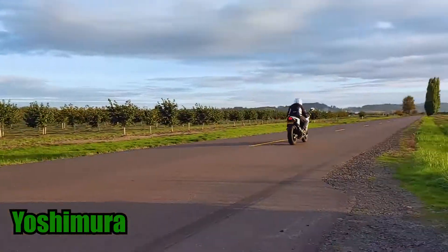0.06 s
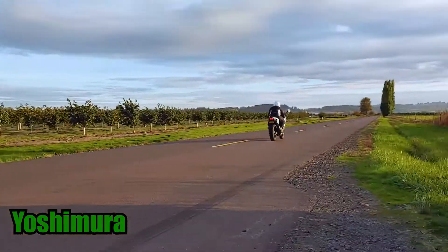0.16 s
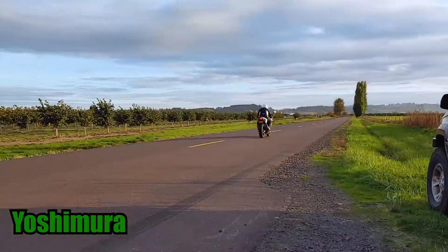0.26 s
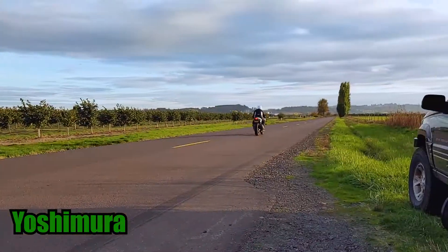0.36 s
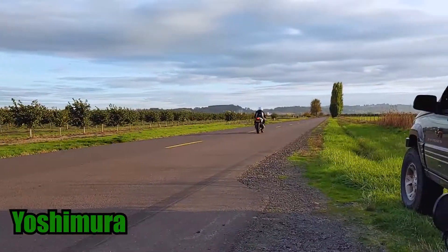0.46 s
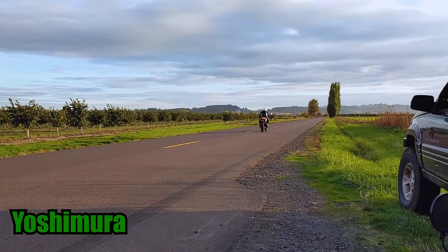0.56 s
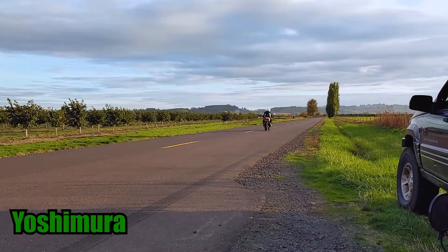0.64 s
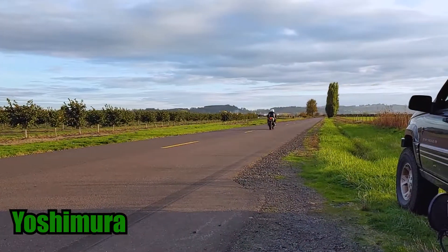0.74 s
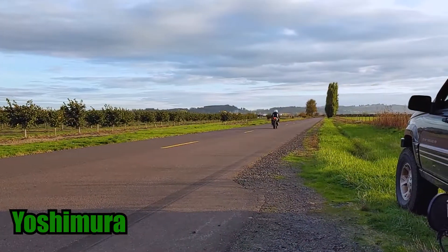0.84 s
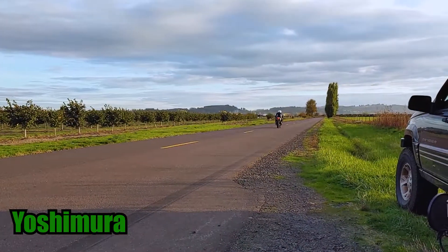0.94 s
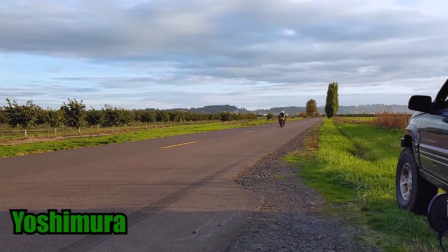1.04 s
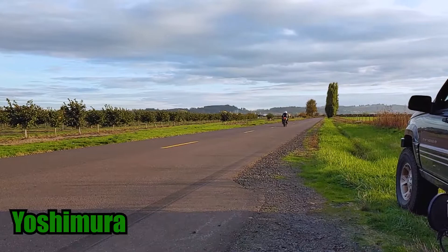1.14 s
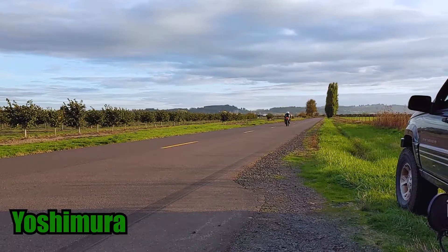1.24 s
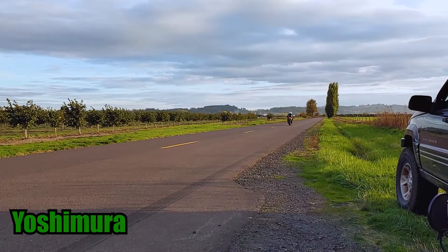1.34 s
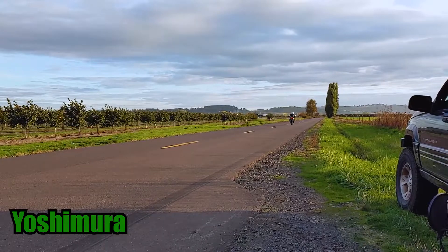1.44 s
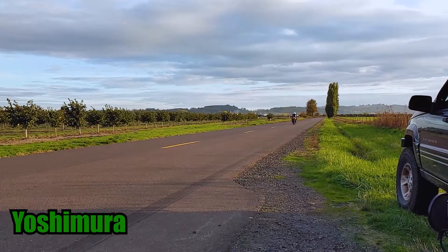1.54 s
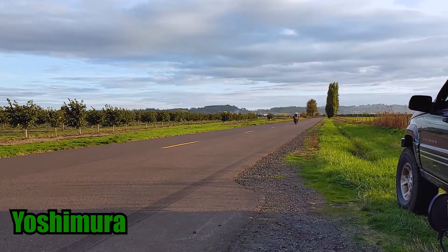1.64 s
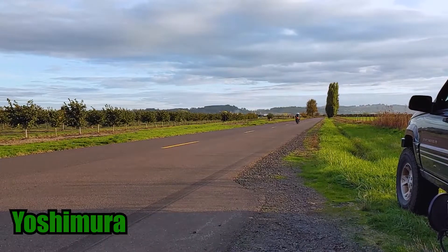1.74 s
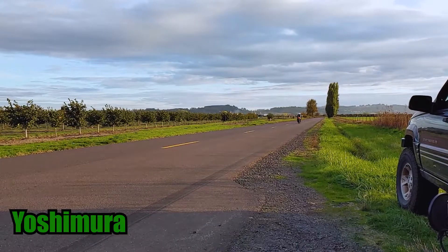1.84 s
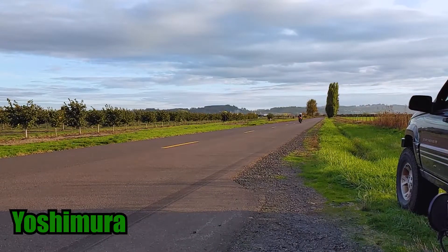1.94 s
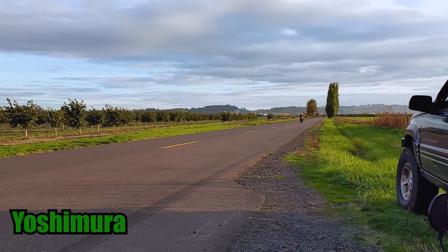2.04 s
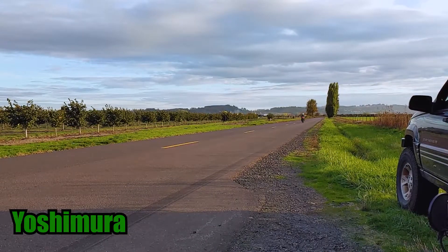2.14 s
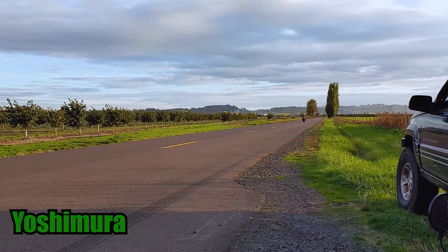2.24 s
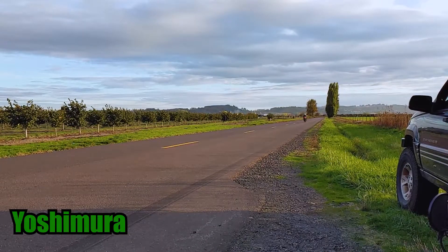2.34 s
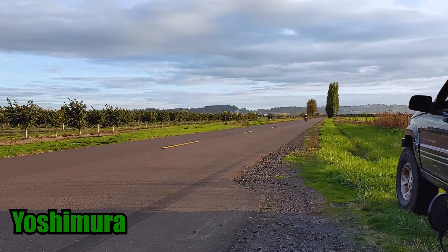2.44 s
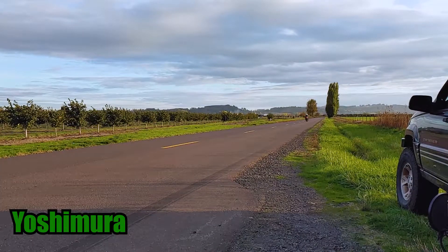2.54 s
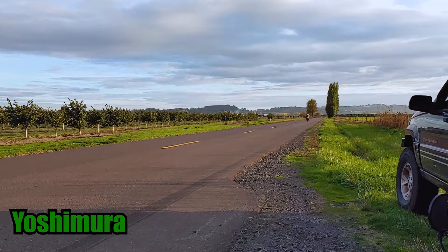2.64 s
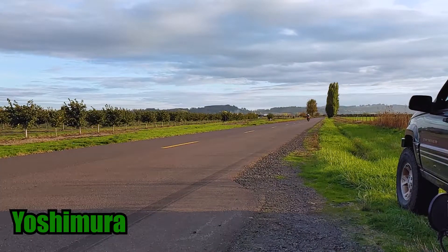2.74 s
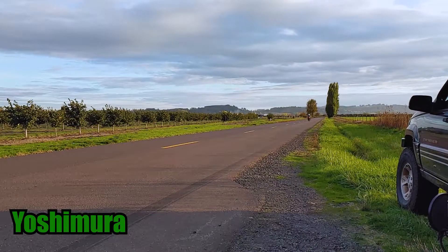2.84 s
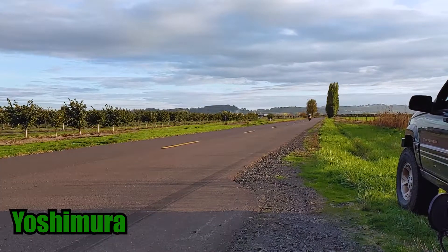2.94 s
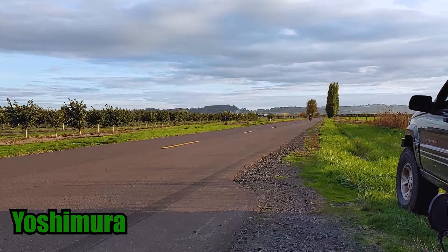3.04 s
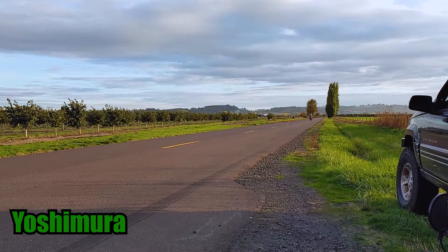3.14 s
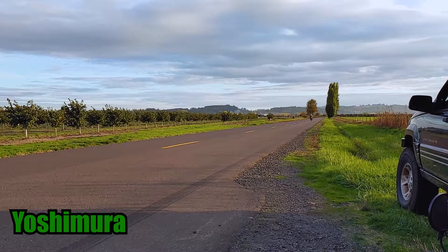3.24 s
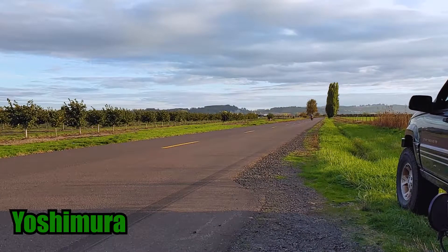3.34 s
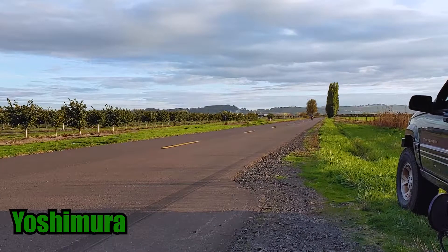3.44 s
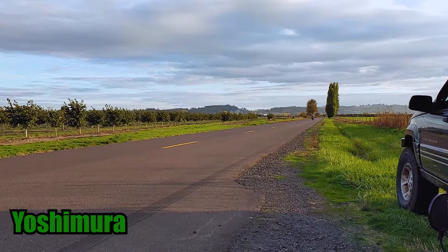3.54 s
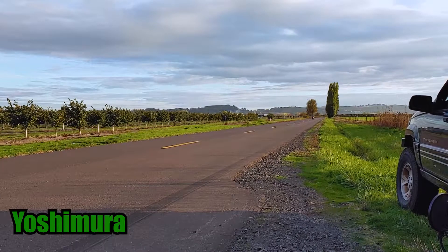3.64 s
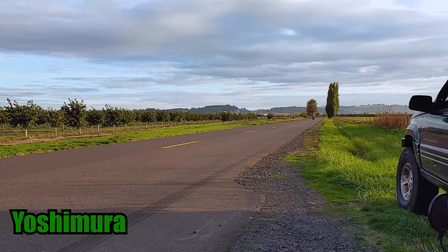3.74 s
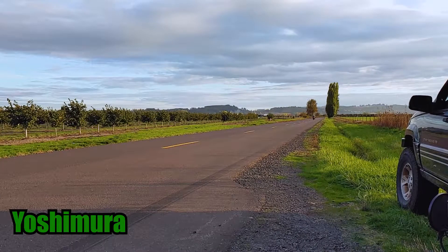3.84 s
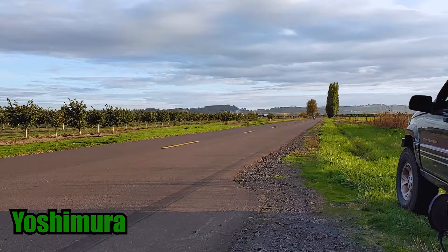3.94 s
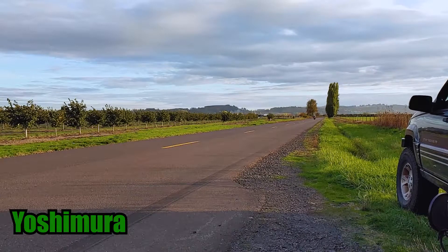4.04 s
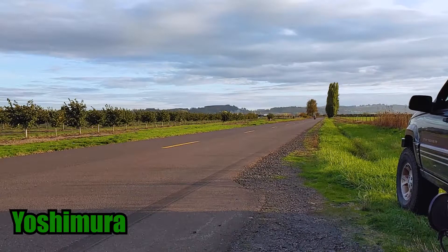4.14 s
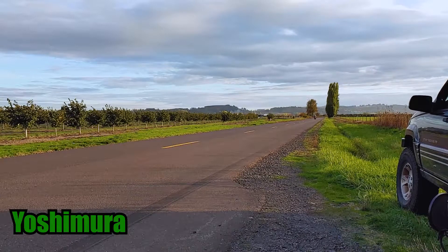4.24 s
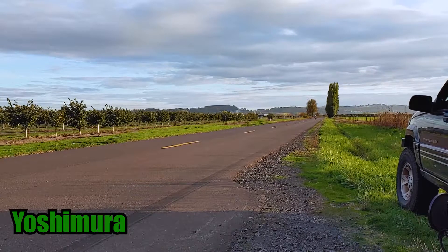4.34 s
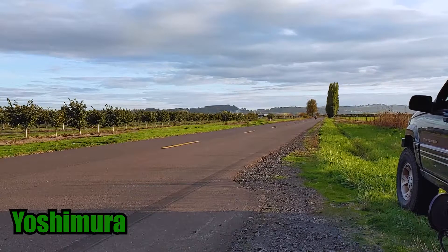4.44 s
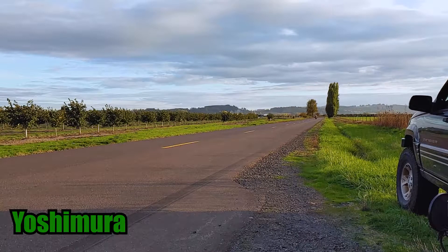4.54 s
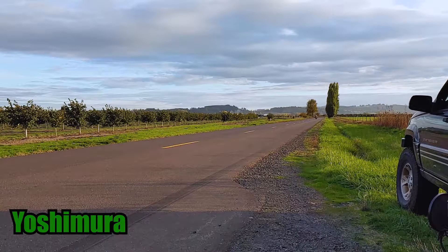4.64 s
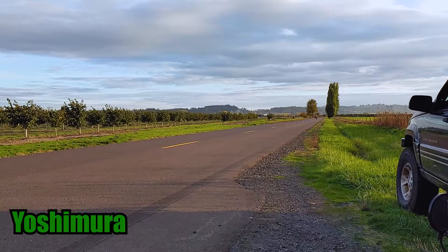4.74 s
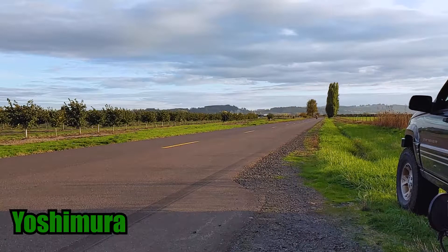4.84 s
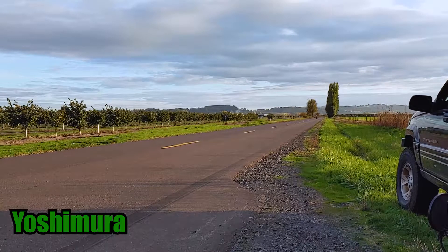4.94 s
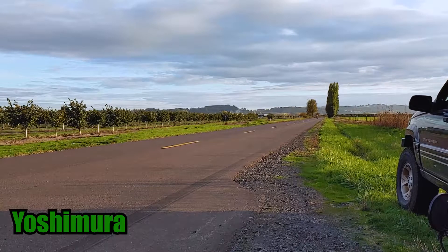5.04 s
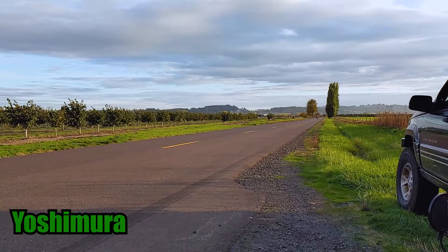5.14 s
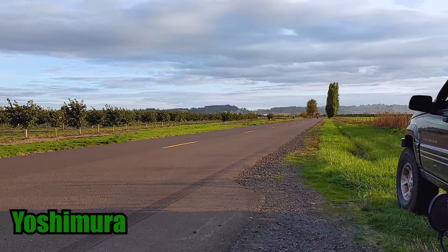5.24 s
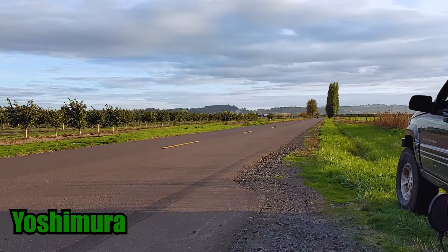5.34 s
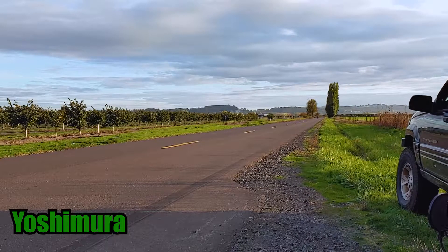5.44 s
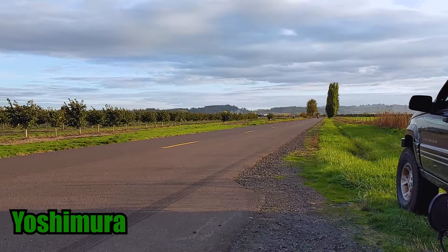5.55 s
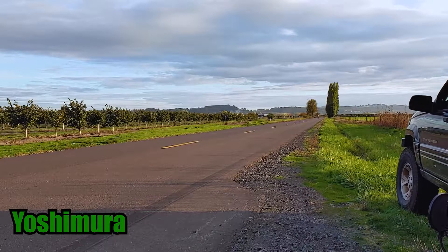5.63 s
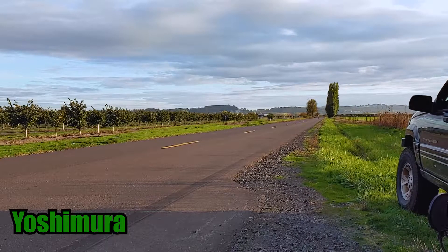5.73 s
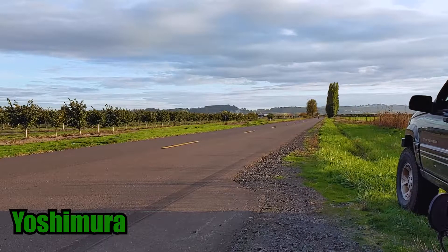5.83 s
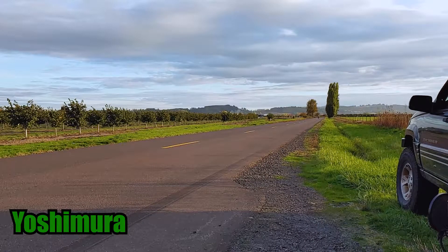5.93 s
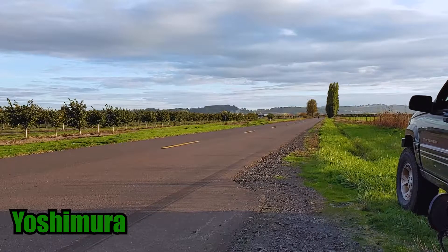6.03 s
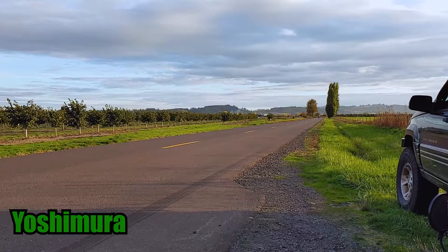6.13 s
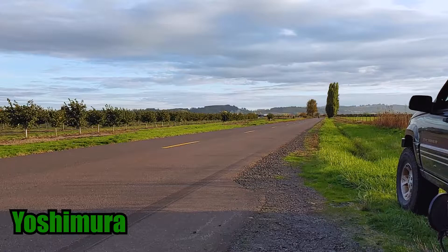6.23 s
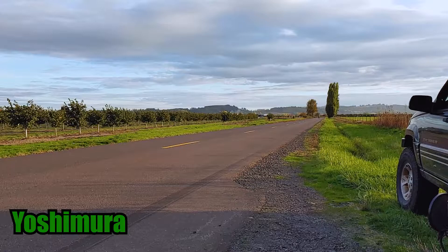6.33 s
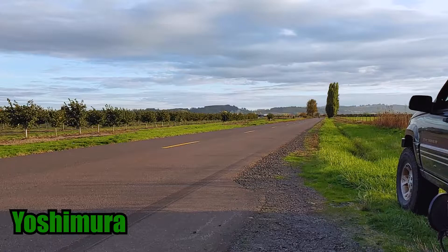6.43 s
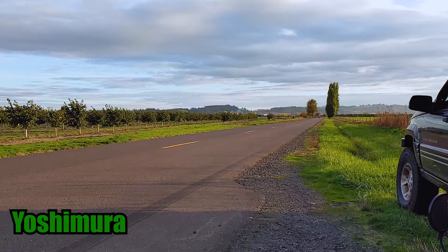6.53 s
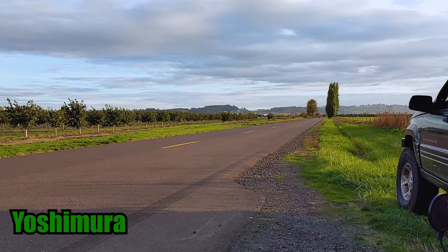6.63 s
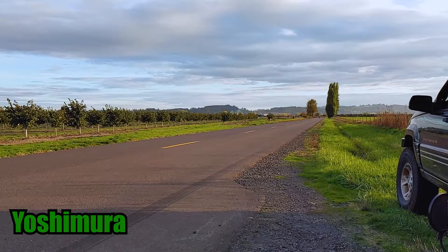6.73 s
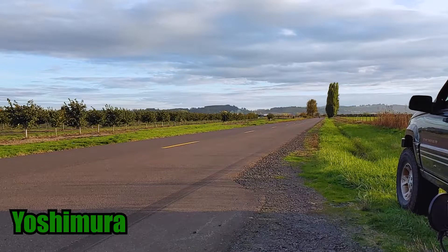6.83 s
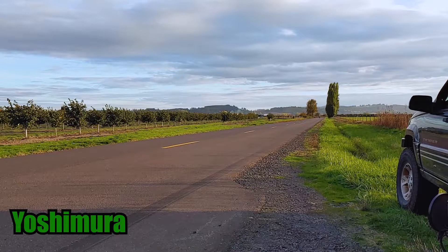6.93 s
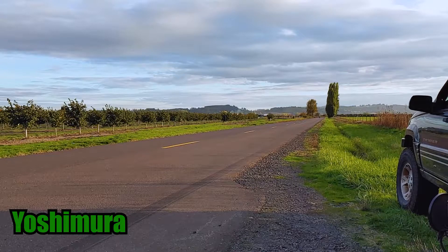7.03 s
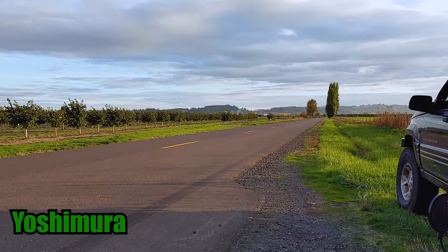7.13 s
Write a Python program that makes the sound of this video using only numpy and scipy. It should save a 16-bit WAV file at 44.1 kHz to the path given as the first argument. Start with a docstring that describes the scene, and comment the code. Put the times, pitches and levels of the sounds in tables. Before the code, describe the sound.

A loud motorcycle has just passed a fixed roadside microphone in open farmland. From 0 s its exhaust is close and heavy: a low, rapid throbbing with a hard bark, rough gas rasp and a slight metallic ring. Over the first three seconds the pitch climbs steadily while the machine recedes, losing bite and treble, the rasp sharpening just before the shift. At about 3.2 s the throttle snaps shut for an instant; a brief burble, spit and dull thud follow, and by 3.5 s the note has dropped noticeably and pulls again in the higher gear. It rises slowly until about 5.4 s, increasingly distant and with shifting colour. Then the rider rolls off: the roar collapses into a quiet low coasting burble, sinking in pitch, with a faint gear whine swelling around 6.6 s. Very faint field rustle and soft low wind bumps, mainly from 3.9 s, lie behind. It ends near 7 s.

```python
"""A loud motorcycle pulls away down a country road, shifts up once, then rolls off the throttle far away.
Exhaust: each firing is a pressure thump (sum of orders) with a crack and puff of gas noise, ringing the can.
Throttle, gear and distance set the levels; road reflection, ground and moving air colour the rasp.
Gear whine swells on the closed throttle; behind it all, faint field rustle and gusts on the microphone."""
import sys
import numpy as np
from scipy import signal
from scipy.fft import rfft, irfft, next_fast_len
from scipy.io import wavfile
from scipy.ndimage import uniform_filter1d

SR = 44100
rng = np.random.default_rng(int(sys.argv[2]) if len(sys.argv) > 2 else 0)


def put_to_file(sound):
    """Save the sound as 16-bit audio at rate SR, in the file named by the first command-line argument."""
    columns = np.atleast_2d(sound).T  # one column per channel
    safe = np.clip(columns, -1, 1)
    whole_steps = np.round(safe * 32767)
    wavfile.write(sys.argv[1], SR, whole_steps.astype(np.int16))


N = 316765
T = np.arange(N) / SR
START_M, SPEED_M_PER_S = 10, 19


def undb(db):
    """Decibels to gain."""
    return 10 ** (np.asarray(db) / 20)


def curves(table):
    """Each column of a table, joined by straight lines in time."""
    s, *columns = np.transpose(table)
    return [np.interp(T, s, c) for c in columns]


def unit(x):
    """Scale to rms 1."""
    return x / np.sqrt(np.mean(x ** 2))


def band_filter(x, order, edges_hz):
    """Butterworth band-pass."""
    return signal.sosfilt(signal.butter(order, edges_hz, "bandpass", fs=SR, output="sos"), x)


def walk(width_hz):
    """Noise under a Gaussian low-pass of the given width; rms 1."""
    f = np.fft.rfftfreq(N, 1 / SR)
    return unit(irfft(rfft(rng.standard_normal(N)) * np.exp(-(f / width_hz) ** 2), N))


def flutter(rate_hz):
    """Random levels held 1 / rate_hz seconds and slewed; rms 1."""
    hold = max(int(SR / rate_hz), 1)
    levels = rng.standard_normal(1024)[np.arange(N) // hold % 1024]
    return unit(uniform_filter1d(levels, hold))


def bands(x, colour, count=22):
    """Colour a sound by (Hz, dB) points and split it into overlapping bands; yields (centre Hz, band)."""
    size = next_fast_len(N)
    octave = np.log2(np.fft.rfftfreq(size, 1 / SR) + 1)
    hz, db = np.transpose(colour)
    spectrum = rfft(x, size) * undb(np.interp(octave, np.log2(hz), db))
    centres, step = np.linspace(np.log2(hz[0]), np.log2(hz[-1]), count, retstep=True)
    for c in centres:
        triangle = np.maximum(1 - abs(octave - c) / step, 0)
        yield 2 ** c, irfft(spectrum * triangle, size)[:N]


def nearness(metres, reach_m, order):
    """1 close to the microphone, 0.5 at reach_m, 0 far beyond; order sets the steepness."""
    return 1 / (1 + (metres / reach_m) ** order)


def field():
    """Faint rustle of the open land, and gusts rumbling on the microphone."""
    # Open-field spectrum. Each row: frequency in Hz, relative level in dB per Hz.
    field_colour = [(40, -7.5), (90, -0.5), (200, -23), (500, -25), (800, -26.5), (1400, -13), (1800, -26),
                    (2400, -17.5), (3600, -31), (4400, -29.5), (5500, -42), (8000, -55), (14000, -70)]
    # Gusts. Each row: peak time in seconds, level in dB.
    gusts = [(3.88, -33), (4.18, -43), (4.4, -46), (4.62, -50), (4.83, -44), (5.69, -47), (6.72, -55)]
    gust_s, breeze_db, rustle_db = 0.056, -65, -56
    noise = rng.standard_normal(N)
    rustle = sum(band * undb(0.47 * flutter(3.8)) for _, band in bands(noise, field_colour))
    rumble = band_filter(rng.standard_normal(N), 2, [14, 36])
    wind = undb(breeze_db) + sum(undb(db) * np.exp(-abs(T - s) / gust_s) for s, db in gusts)
    return unit(rustle) * undb(rustle_db) + unit(rumble) * wind


def gear_whine(rate_hz, waver_db=2.5, ring_hz=4080, ring_width_hz=110, ring_db=-19):
    """A gear mesh, locked to the firing rate, swells and fades with a thin high ring."""
    mesh_order = 12.9  # multiple of the firing rate
    swell_s, half_width_s, top_db = 6.58, 0.52, -51.5
    mesh = np.sin(2 * np.pi * mesh_order * np.cumsum(rate_hz) / SR) * undb(waver_db * flutter(11))
    ring = np.sin(2 * np.pi * ring_hz * T) * walk(ring_width_hz) * undb(ring_db)
    swell = np.exp(-((T - swell_s) / half_width_s) ** 2)
    return (mesh + ring) * undb(top_db) * swell


def gear_change(rise_s=0.0031):
    """The pipe burbles with the throttle shut, then spits and thuds as the next gear bites."""
    # Noise bursts. Each row: start in seconds, decay length in seconds, low edge in Hz, high edge in Hz,
    # level before the envelope in dB.
    upshift = [(3.21, 0.17, 78.5, 255, -44), (3.321, 0.017, 494, 3640, -39.5), (3.34, 0.0132, 90, 330, -33)]
    out = 0
    for start_s, length_s, low_hz, high_hz, db in upshift:
        age_s = np.maximum(T - start_s, 0)
        noise = band_filter(rng.standard_normal(N), 3, [low_hz, high_hz])
        envelope = (1 - np.exp(-age_s / rise_s)) * np.exp(-(age_s / length_s) ** 2)
        out = out + unit(noise) * undb(db) * envelope
    return out


def firings(rate_hz, start_cycles=0.92, uneven_cycles=0.002):
    """Crank angle in cycles, whole at each firing, and the index of the nearest firing."""
    turns = start_cycles + np.cumsum(rate_hz) / SR
    slip = uneven_cycles * rng.standard_normal(1024)  # no two burns take equally long
    turns = turns + np.interp(turns, np.arange(len(slip)), slip)
    return turns, np.round(turns).astype(int)


def firing_clicks(turns):
    """A one-sample impulse each time the crank angle passes a whole cycle."""
    return np.diff(np.floor(turns), prepend=np.floor(turns[0]))


def exhaust_db(voice, rate_hz, throttle, metres, close):
    """Level of one exhaust voice: the throttle moves it from coasting to full load, distance thins it."""
    beam_m = 26.6  # the pipe points back at the microphone: the level holds up until about here
    coast_hz, pumping_db_per_hz = 52.9, 0.41  # with the throttle shut, faster revs pump more air
    clutch_s, clutch_bite_s = 3.23, 0.23  # second gear takes up the load
    load_db, beside_db, second_db, shut_db = voice
    second_gear = np.clip((T - clutch_s) / clutch_bite_s, 0, 1)
    pulling_db = load_db + beside_db * close + second_db * second_gear
    coasting_db = shut_db + pumping_db_per_hz * (rate_hz - coast_hz)
    load = np.minimum(throttle / 0.947, 1)  # the last of the twist adds no more level
    distance_db = 20 * np.log10(np.hypot(metres, beam_m))
    return coasting_db + load * (pulling_db - coasting_db) - distance_db


def can_ring(turns, metres, bark_db, reach_m=48, ring_hz=1110, width_hz=130, ring_db=-22, waver_db=2):
    """Every firing rings the silencer can, which lifts two or three clean orders; it does not carry far."""
    edges_hz = [ring_hz - width_hz / 2, ring_hz + width_hz / 2]
    ring = band_filter(firing_clicks(turns), 2, edges_hz)
    level = undb(bark_db + ring_db + waver_db * flutter(6))
    return unit(ring) * nearness(metres, reach_m, order=6) * level


def silencer(size=4096, swell_s=0.0024, tail_s=0.016, tail=0.27):
    """Response of the can: dense echoes that swell and fade, smearing a shock but leaving its colour even."""
    age_s = T[:size] - T[size // 2]
    envelope = np.exp(-abs(age_s) / swell_s) + tail * np.exp(-abs(age_s) / tail_s) * (age_s > 0)
    echoes = rfft(rng.standard_normal(size) * envelope)
    return irfft(echoes / np.sqrt(uniform_filter1d(abs(echoes) ** 2, size=17)))


def gas_jet(turns, throttle, close, strength, steady_db=-15, near_steady_db=3, scatter_db=1.6):
    """Each firing lets out a shock and a puff of turbulence over a steady rush; puffs fade off throttle."""
    rise_cycles, fall_cycles, crack_db, idle_shock = 0.1, 0.1, 1.5, 0.25
    angle = turns - np.round(turns)
    puff = np.exp(-abs(angle) / np.where(angle < 0, rise_cycles, fall_cycles))
    blow = throttle * undb(scatter_db * strength)
    gate = np.hypot(puff * blow, undb(steady_db + near_steady_db * close))
    shock = unit(firing_clicks(turns)) * np.hypot(blow, idle_shock)
    # the same rattle at every firing draws fine lines far up the spectrum
    shock = signal.fftconvolve(shock, silencer(), "same")
    shock = signal.sosfilt(signal.butter(3, 680, "highpass", fs=SR, output="sos"), shock)
    jet = gate * rng.standard_normal(N) + shock * undb(crack_db) * np.std(puff)
    power = uniform_filter1d(uniform_filter1d(jet ** 2, size=4000), size=4000)
    return jet / np.sqrt(power)  # even running level; exhaust_db sets loudness


def ground_db(hz, metres):
    """Path colour at one frequency: fixed ripples in the middle distance, one moving band far away."""
    # Middle-distance ripple. Each row: frequency in Hz, full-strength gain in dB.
    near_colour = [(700, -5.5), (880, 3.5), (1120, 1), (1430, -3), (1750, -2.3), (2300, -3.6), (3400, -1.5),
                   (6000, -1), (9000, 1)]
    # Band favoured by the ground path. Each row: time in seconds, centre in Hz, peak-to-floor contrast in dB.
    ground_band = [(2.35, 2297, 2), (2.9, 2630, 6), (3.4, 2529, 1.5), (3.9, 2420, 3), (4.25, 1502, 8),
                   (4.48, 2290, 6), (4.7, 1620, 8.5), (5.3, 1140, 9.5), (6, 1340, 8)]
    far_m, half_width_octaves = 50, 0.4
    road_sweep_m = 16.8  # closer than this the road reflection alone colours the rasp
    near = nearness(metres, far_m, order=8)
    ripple_db = np.interp(hz, *np.transpose(near_colour)) * (1 - nearness(metres, road_sweep_m, order=10))
    centre_hz, contrast_db = curves(ground_band)
    bump = np.exp(-(np.log2(hz / centre_hz) / half_width_octaves) ** 2)
    far_db = contrast_db * (bump - 0.25)
    return near * ripple_db + (1 - near) * far_db


def rasp(jet, metres, close, throaty_db, sharp_db, road_share=0.46, shimmer_db=1.11,
         road_lag_s=0.00105, hiss_share=0.62):
    """The jet down the road: a reflection sweeps upward, eddies shift the colour, air takes the treble."""
    # Gas noise at the pipe. Each row: frequency in Hz, relative level in dB per Hz.
    gas_colour = [(90, 2), (200, 2.5), (330, 10.5), (520, 12), (650, 10.5), (790, 1.5), (1100, -2.5),
                  (1600, 0.5), (2400, 0), (3500, -0.5), (4400, -2.5), (5500, -8), (8000, -8), (11500, -9.5),
                  (15000, -14.5)]
    air_db_per_m = 0.44  # per 10 kHz above 3 kHz
    bounce = np.interp(T - road_lag_s * START_M / metres, T, jet)  # road_lag_s holds at START_M
    share = road_share * close
    jet = (jet + share * bounce) / np.hypot(1, share)
    out, eddy = 0, flutter(30)
    jet_bands = bands(jet, gas_colour, count=30)
    hiss_bands = bands(rng.standard_normal(N), gas_colour, count=30)
    for (hz, band), (_, hiss) in zip(jet_bands, hiss_bands):
        smooth = min(hiss_share, 1) * np.interp(hz, [2500, 7000], [0, 1])  # the top is mostly even hiss
        band = np.sqrt(1 - smooth) * band + np.sqrt(smooth) * hiss
        sharpness = np.interp(hz, [1700, 2700], [0, 1])
        voice_db = throaty_db + sharpness * (sharp_db - throaty_db)
        absorbed_db = air_db_per_m * metres * max(hz / 1e4 - 0.3, 0)
        eddy = (eddy + flutter(30)) / np.sqrt(2)  # neighbouring bands flicker together
        # shimmer_db holds at 60 m from 1500 Hz up
        eddies_db = shimmer_db * min(hz / 1500, 1) * np.sqrt(metres / 60) * eddy
        out = out + band * undb(voice_db - absorbed_db + eddies_db + ground_db(hz, metres))
    return out * undb(12.0)


def thump(turns, rate_hz, throttle, close, strength, boom_db, bark_db, lead_rad=0.1, split_rad=3.04,
          scatter_db=0.2, coast_scatter_db=0.63):
    """The pressure pulse: its orders line up into one spike under load and drift apart when coasting."""
    # Loaded pulse beside the bike, then from behind. Each row: multiple of the firing rate,
    # relative level in dB before the nearness weighting.
    close_orders = [(1, 3.5), (2, -1), (3, -7.5), (4, -9), (5, -18), (6, -19), (7, -25), (8, -26), (9, -12),
                    (10, -16), (11, -26), (12, -26.5)]
    pulling_orders = [(1, 0.5), (2, -3.5), (3, -8), (4, -21), (5, -9), (6, -10), (7, -14.5), (8, -13),
                      (9, -19.5), (10, -23), (11, -21), (12, -26)]
    # Pipe response on a closed throttle. Each row: frequency in Hz, relative level in dB.
    coasting_colour = [(50, 2.5), (70, 11.5), (92, -5), (100, -1.5), (135, 1), (152, 1), (205, -5),
                       (250, 5), (285, 2.5), (305, -3.5), (400, -3.5), (450, -21), (500, -24), (600, -10.5),
                       (800, -35)]
    low, high, low_power, high_power = 0, 0, 0, 0
    for (k, close_db), (_, pull_db) in zip(close_orders, pulling_orders):
        k = round(k)
        coast_db = np.interp(k * rate_hz, *np.transpose(coasting_colour))
        load_db = close * close_db + (1.5 - close) * pull_db
        gain = undb(throttle * load_db + (1 - throttle) * coast_db)
        drift_rad = (1 - throttle) * rng.uniform(-np.pi, np.pi)
        angle = 2 * np.pi * k * turns + lead_rad / k + drift_rad
        size = -gain * undb((1.5 - throttle) * coast_scatter_db * flutter(14))
        if k < 4:
            low = low + size * np.cos(angle)
            low_power = low_power + gain ** 2 / 2
        else:  # beside the bike the upper orders are out of step, which splits the spike in two
            high = high + size * np.cos(angle + split_rad * close)
            high_power = high_power + gain ** 2 / 2
    boom = low / np.sqrt(low_power) * undb(boom_db)
    bark = high / np.sqrt(high_power) * undb(bark_db + scatter_db * strength)
    return boom + bark


def scene():
    """One crank drives thump, rasp, can ring and whine while the machine recedes."""
    # Engine speed as heard. Each row: time in seconds, firing rate in Hz.
    speed = [(0.0, 51.62), (0.3, 53.14), (0.8, 56.23), (1.9, 61.78), (3.14, 67.21), (3.25, 69.8),
             (3.33, 69.16), (3.39, 60.58), (3.55, 55.17), (4.3, 57.47), (5.39, 60.02), (5.66, 52.36),
             (6.3, 50.37), (7.18, 48.4)]
    # Rider's hand. Each row: time in seconds, throttle 0-1.
    throttle_points = [(0, 0.79), (3.16, 0.8), (3.235, .15), (3.33, 0.02), (3.355, 1), (5.37, 1),
                       (5.47, 0.04), (7.18, 0.04)]
    # Exhaust voices: lowest orders, upper orders, throaty gas, sharp gas. Each holds, before distance loss:
    # level under load in dB, extra beside the bike in dB, extra in second gear in dB, throttle-shut level in dB.
    voices = [(10.5, 5.5, -5, -8.5), (4, 6.5, -3.5, -10), (-9.5, 8, 1, -21), (-9.5, -0.2, -0.5, -23.5)]
    flare_hz, flare_db_per_hz = 63.5, 1.3  # above this firing rate the sharp gas flares up
    rate_hz = curves(speed)[0]
    turns, cycle = firings(rate_hz)
    throttle = np.clip(curves(throttle_points)[0], 0, 1)
    metres = START_M + SPEED_M_PER_S * T
    close = nearness(metres, reach_m=23.4, order=7)  # side view turns into rear view
    boom_db, bark_db, throaty_db, sharp_db = (
        exhaust_db(voice, rate_hz, throttle, metres, close) for voice in voices)
    sharp_db = sharp_db + flare_db_per_hz * throttle * np.maximum(rate_hz - flare_hz, 0)
    # random strength of each firing
    burn, turbulence = uniform_filter1d(rng.standard_normal((1024, 2))[cycle].T, size=200)
    jet = gas_jet(turns, throttle, close, 0.5 * burn + 0.16 * turbulence)
    background = field() + gear_whine(rate_hz) + gear_change()
    exhaust = can_ring(turns, metres, bark_db) + rasp(jet, metres, close, throaty_db, sharp_db)
    exhaust = exhaust + thump(turns, rate_hz, throttle, close, burn, boom_db, bark_db)
    return (background + exhaust)[None]


def record(dry, top_hz=15600):
    """The camera cuts the top: a steep elliptic low-pass."""
    return signal.sosfilt(signal.ellip(8, 0.2, 70, top_hz, fs=SR, output="sos"), dry)


dry = scene()
out = record(dry)
put_to_file(out)
```